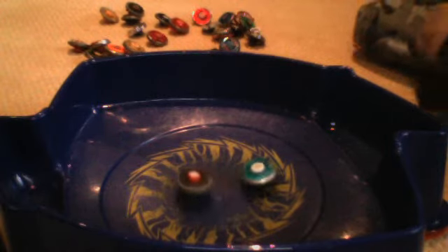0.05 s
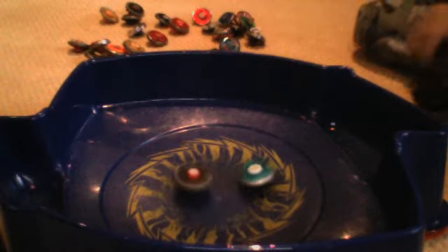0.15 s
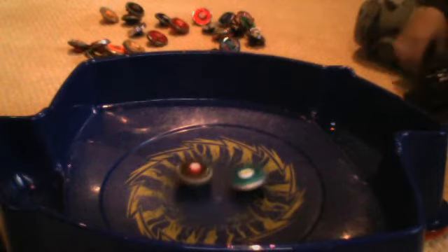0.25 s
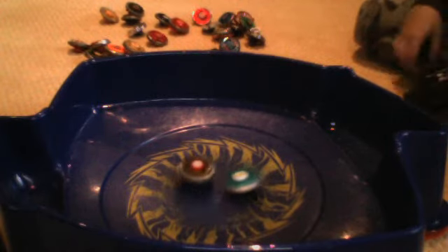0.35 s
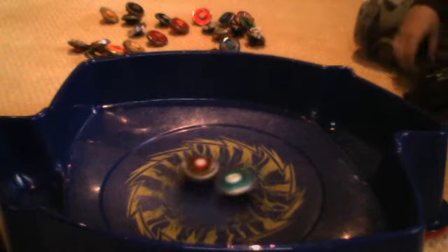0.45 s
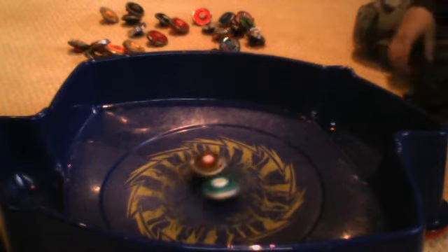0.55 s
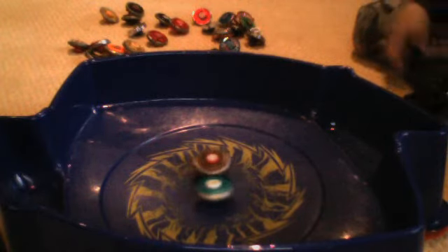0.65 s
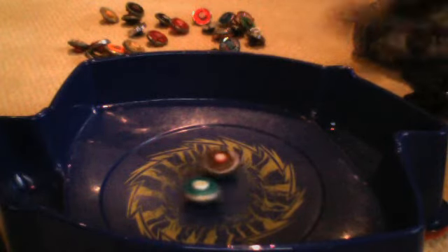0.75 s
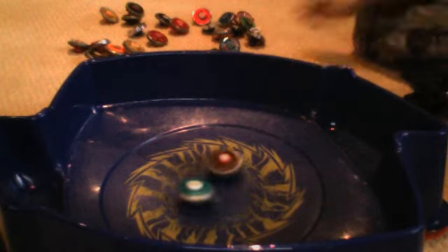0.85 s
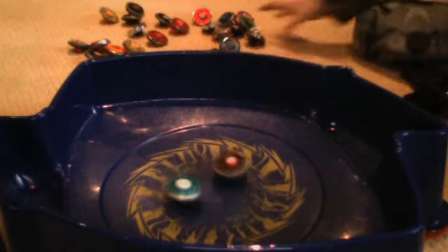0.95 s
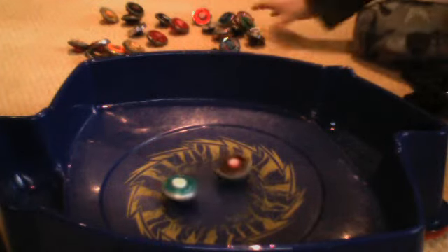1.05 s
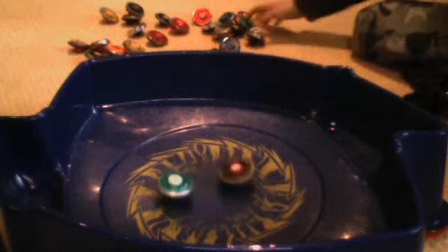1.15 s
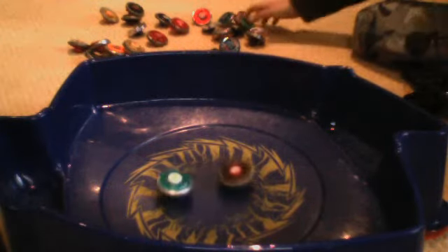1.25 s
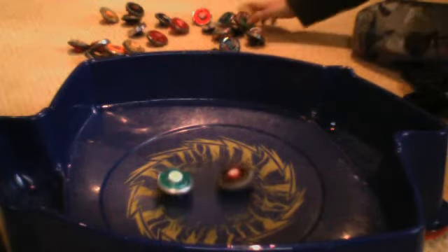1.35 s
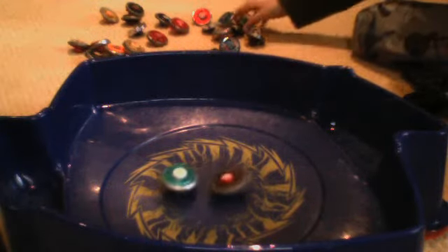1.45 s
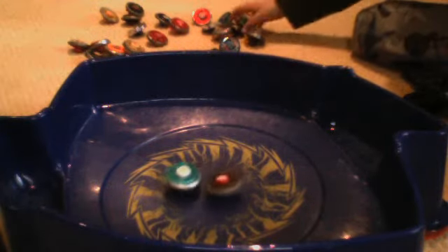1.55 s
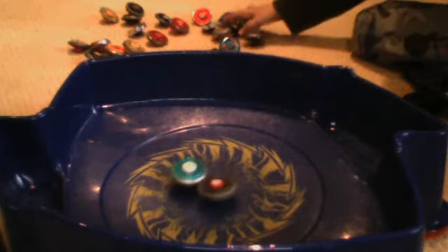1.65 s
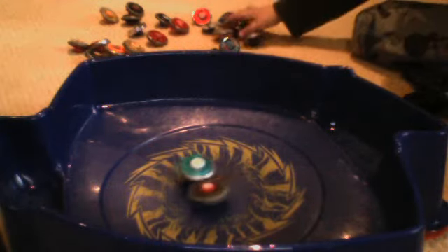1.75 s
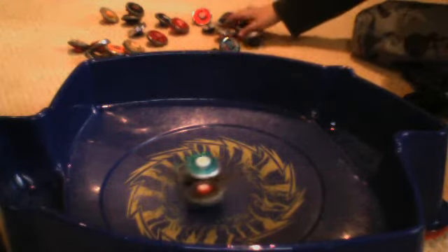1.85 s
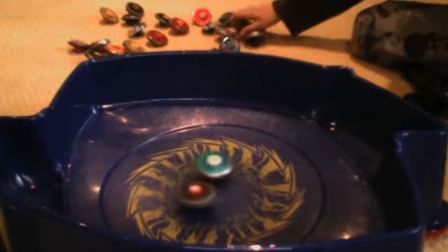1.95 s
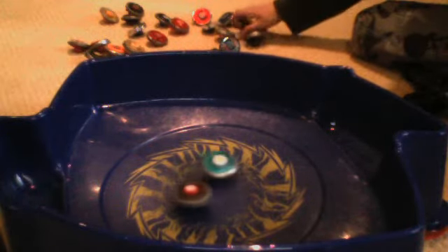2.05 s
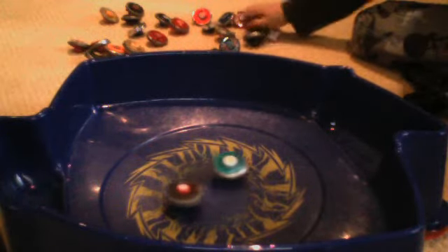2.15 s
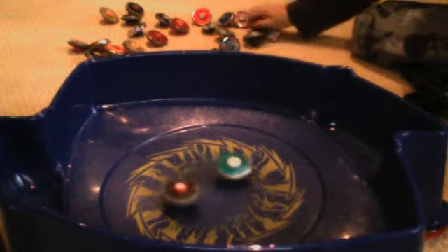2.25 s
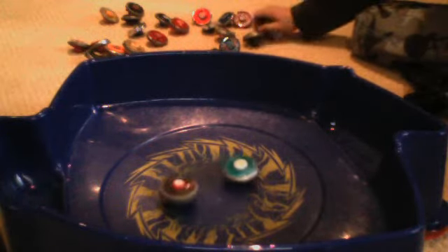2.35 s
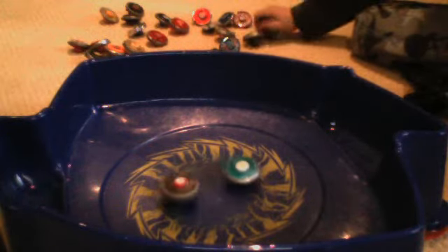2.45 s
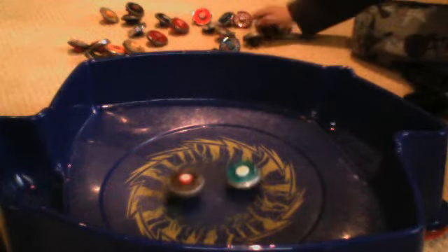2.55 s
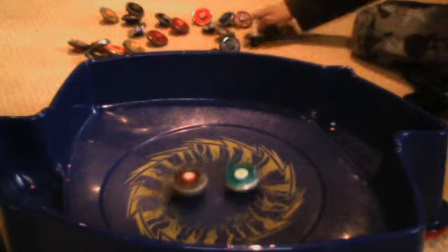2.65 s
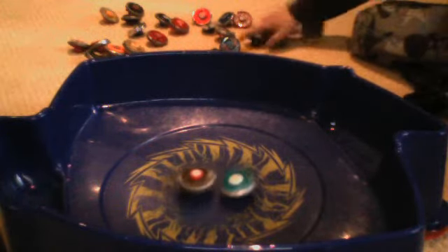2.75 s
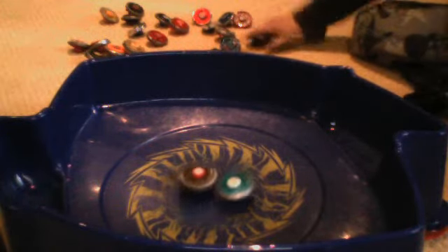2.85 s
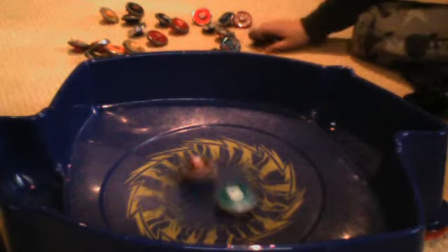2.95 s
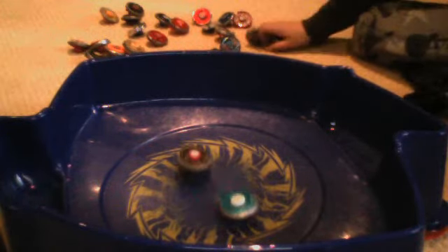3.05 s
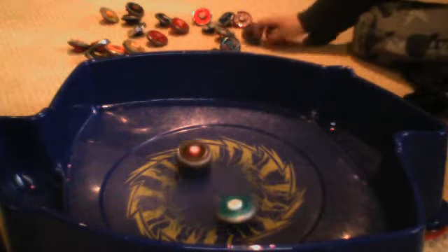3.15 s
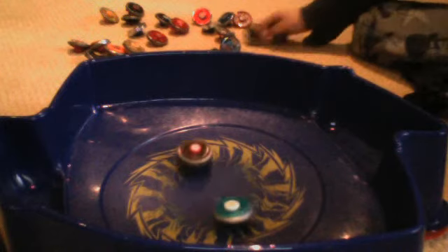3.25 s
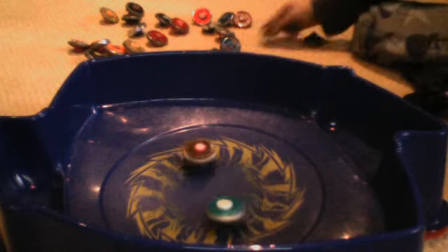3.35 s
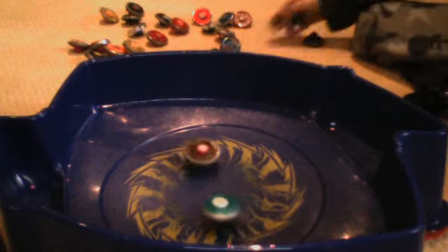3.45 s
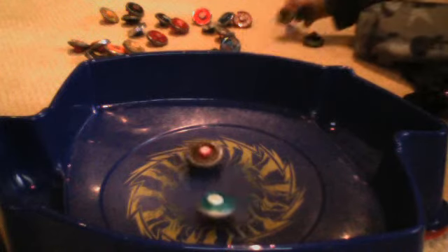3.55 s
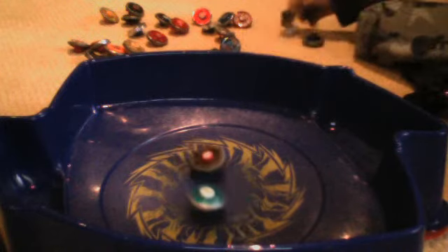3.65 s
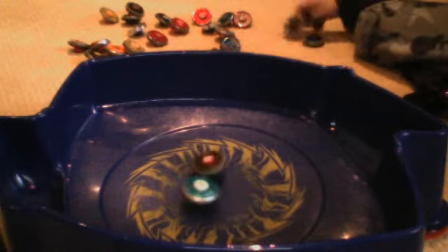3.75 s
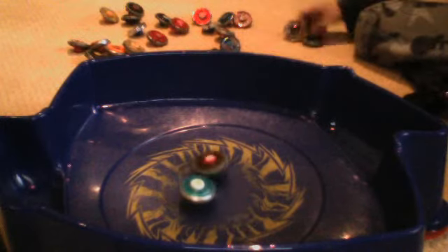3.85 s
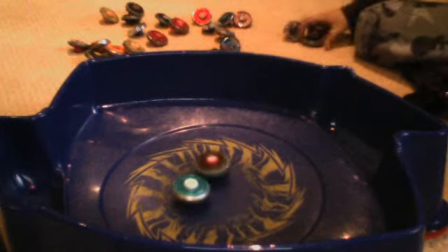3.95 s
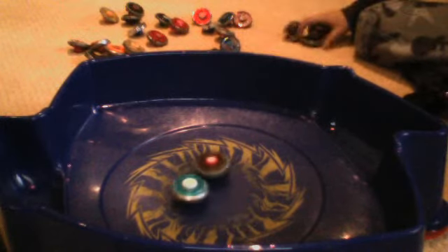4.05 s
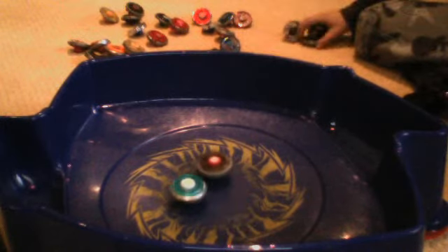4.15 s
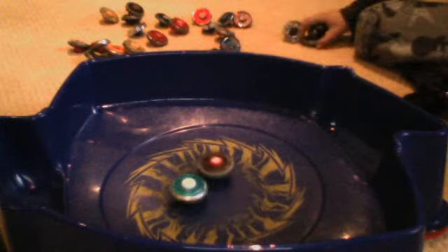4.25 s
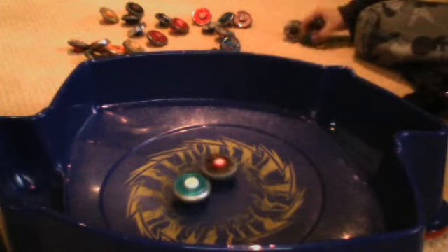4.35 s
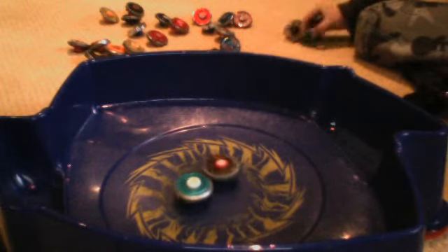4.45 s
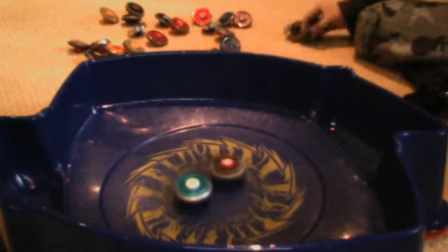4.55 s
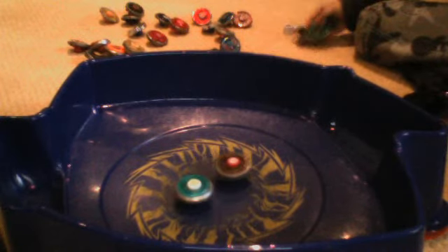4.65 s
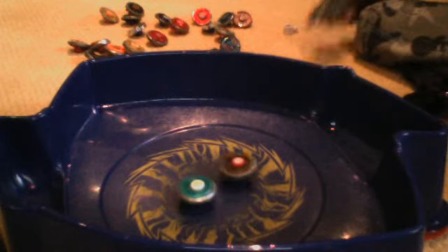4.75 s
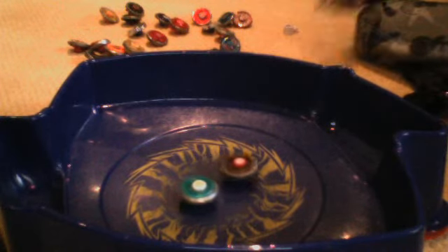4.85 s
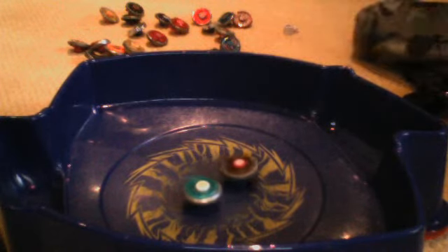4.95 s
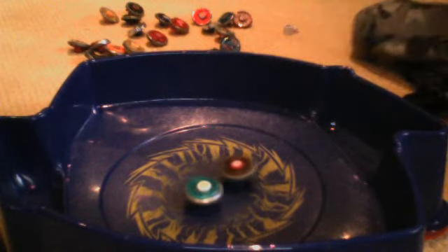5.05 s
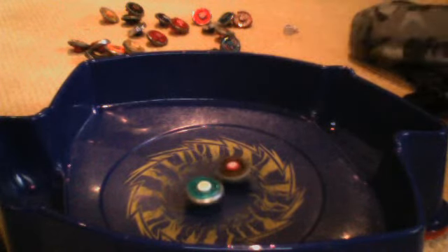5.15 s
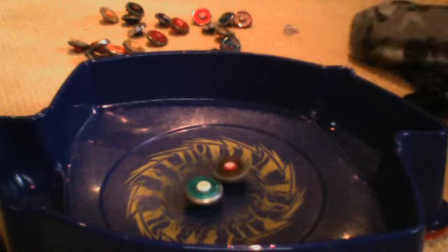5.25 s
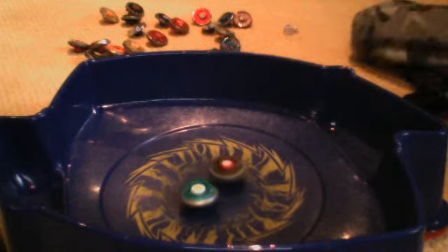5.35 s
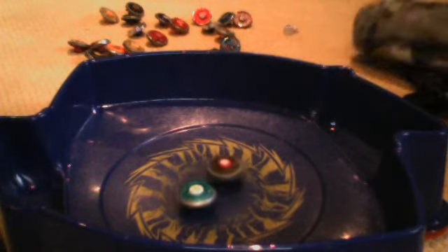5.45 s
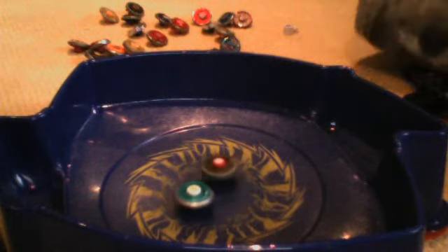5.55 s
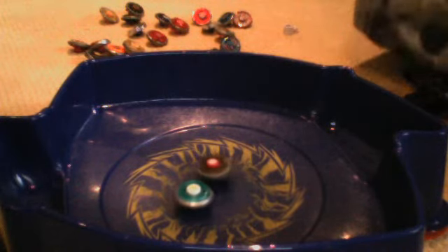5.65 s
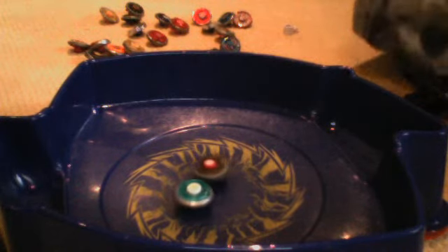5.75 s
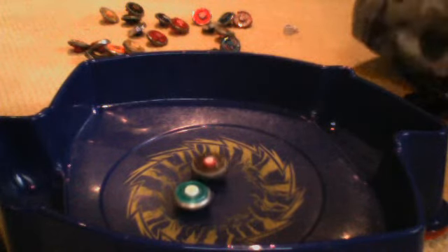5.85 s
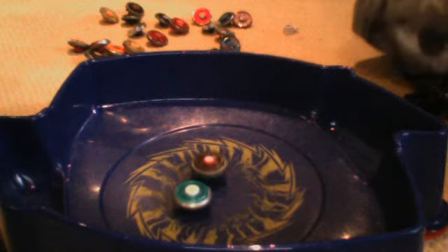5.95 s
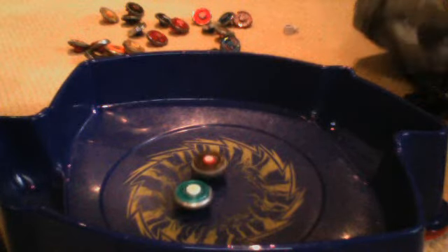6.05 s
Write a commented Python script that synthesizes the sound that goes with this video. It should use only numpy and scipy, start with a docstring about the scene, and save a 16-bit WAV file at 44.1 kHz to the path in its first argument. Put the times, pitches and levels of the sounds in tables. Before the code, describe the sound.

Two metal-ringed tops spin in a plastic bowl, their tips making light, rapid taps and soft scraping under a faint whir. A faint high ring is already fading at the start. The first sharp clink comes at about 0.4 seconds, followed by three quick ones around 1.5 to 1.7. Each leaves a high, fluttering metallic ring and a slight hollow knock from the bowl. A pair lands at 2.7 and 2.9, the second the loudest, with a soft thud just after. Three more come between 3.7 and 4.0, one at 4.4, and two around 5.1 and 5.2. Spare tops clink faintly now and then as they are handled beside the bowl. From about 5.4 to 5.7 a handful of loose parts rattles, and a last strong clash rings out at 5.75. The room is quiet, with a low steady hum.

```python
"""Spinning tops clashing in a bowl

Two metal-ringed tops circle in a plastic bowl. Each clash excites their modes, and the spin splits
the rings' modes into lines that sing on. The wobbling tips tap the bowl floor about once a turn.
Beside the bowl a hand picks over spare tops, something thuds softly, and near the end a handful
of parts rattles. A quiet carpeted room hums below."""
import sys
import numpy as np
from scipy import signal
from scipy.fft import rfft, irfft
from scipy.io import wavfile

SR = 44100
rng = np.random.default_rng(int(sys.argv[2]) if len(sys.argv) > 2 else 0)


def int16_out(signal):
    """Quantize to a 16-bit WAV file."""
    q = np.round(np.clip(np.atleast_2d(signal).T, -1, 1) * 32767)
    wavfile.write(sys.argv[1], SR, q.astype(np.int16))


N = 269010

# Collisions of the tops; the first is already ringing at 0 s. Each row: start in seconds, crack level
# in dB, treble relative to it in dB, disc level in dB, backward and forward wave levels of the first
# ring and then of the second in dB, ring decay time in seconds, bowl boom in dB, its pitch in Hz, hiss
# in dB, highest short modes in dB, forward waves' decay time as a multiple of the ring decay time.
CLASHES = [(0.0, -94, -37, -102, -58.5, -45, -55, -47, 0.5, -65, 544, -80, -84, 0.54),
           (0.44, -24.5, -15, -60.5, -34.5, -27.5, -77.5, -59, 0.73, -49, 490, -54.5, -29, 0.55),
           (1.465, -27, -39, -55, -48, -34.5, -38.5, -30.5, 0.64, -42, 630, -51, -27, 0.89),
           (1.614, -33.5, -28, -56, -31.5, -31, -48.5, -26, 0.2, -69, 624, -52, -35, 0.98),
           (1.666, -28.5, 1, -54.5, -36.5, -43, -30.5, -26.5, 0.55, -65.5, 517, -50.5, -35.5, 1.07),
           (2.732, -28, -4, -50, -31.5, -27, -51, -39, 0.31, -45, 810, -55, -27.5, 1.07),
           (2.854, -17, 15, -30.5, -38.5, -28.5, -56.5, -52, 0.72, -40, 620, -47, -15, 1.105),
           (3.694, -22, 1, -34.5, -58, -74, -33.5, -44, 0.99, -48, 650, -43, -23, .9),
           (3.804, -21, 10.5, -37, -32, -46.5, -36.5, -58, 0.39, -36.5, 746, -49.5, -18.5, .9),
           (3.958, -23.5, 11.5, -40.5, -37, -56, -107, -70, 0.68, -65, 630, -56, -18, 1.8),
           (4.391, -20, -3, -58, -35.5, -40.5, -60.5, -57, 0.5, -50, 795, -55.5, -28.5, 0.96),
           (5.07, -22.5, 4, -54, -44.5, -45, -41.5, -33, 0.67, -79, 376, -60, -27, 1.1),
           (5.211, -27, 4, -41.5, -41.5, -38, -47, -32.5, 0.68, -58.5, 704, -51.5, -25.5, 0.96),
           (5.746, -18.5, 5, -41.5, -42, -32.5, -45, -39, 0.62, -45.5, 560, -46, -39, 0.88)]
# Spectrum of the air whir and of shaken parts hissing. Each row: frequency in Hz, density in dB.
WHIR = [(1500, -20), (3000, 0), (6000, -1), (8200, -6), (9300, -9), (10000, -34.5), (13000, -66)]
SPIN_START, SPIN_LOSS = 25.3, 1.04   # turns per second at 0 s, and lost each second


def amp(db):
    """Decibels as an amplitude ratio."""
    return 10 ** (np.asarray(db) / 20)


def unit_rms(x):
    """Normalisation to unit power."""
    return x / np.sqrt(np.mean(x ** 2) + 1e-20)


def butter(x, order, hz, kind="low"):
    """Butterworth filtering, flat in the passband."""
    return signal.sosfilt(signal.butter(order, hz, kind, fs=SR, output="sos"), x)


def band(x, hz, octaves):
    """Band-pass filtering around hz, scaled to rms 1."""
    edges = np.clip([hz / 2 ** (octaves / 2), hz * 2 ** (octaves / 2)], 20, 15000)
    return unit_rms(butter(x, 2, edges, "band"))


def wobble(hz):
    """Random modulation: low-passed noise of rms 1."""
    return unit_rms(butter(rng.standard_normal(N), 2, hz))


def noise(spectrum):
    """Spectral shaping of white noise, scaled to rms 1."""
    hz, db = np.transpose(spectrum)
    bins_hz = np.arange(1, N // 2 + 2) * SR / N
    gain = amp(np.interp(np.log(bins_hz), np.log(hz), db))
    return unit_rms(irfft(rfft(rng.standard_normal(N)) * gain, N))


def add(out, start, sound):
    """Superposition of a sound from start seconds on."""
    i = round(start * SR)
    out[i:i + len(sound)] += sound[:N - i]


def impulses(times, db):
    """An impulse train with the given levels."""
    out = np.zeros(N) + 1e-18
    np.add.at(out, np.round(np.asarray(times) * SR).astype(int), amp(db))
    return out


def decay(x, t60):
    """Exponential decay: each impulse falls 60 dB in t60 seconds."""
    return signal.lfilter([1], [1, -amp(-60 / (t60 * SR))], x)


def resonator(x, hz, t60):
    """A damped oscillator: each impulse starts a decaying sine."""
    r, w = amp(-60 / (t60 * SR)), 2 * np.pi * hz / SR
    return signal.lfilter([0, np.sin(w)], [1, -2 * r * np.cos(w), r * r], x)


def swell(hz, rise_s, phase=0):
    """A soft contact: a tone that grows for rise_s and dies away."""
    u = np.arange(round(8 * rise_s * SR)) / SR / rise_s
    return (u * np.exp(1 - u)) ** 2 * np.sin(2 * np.pi * hz * u * rise_s + phase)


def room_hum():
    """Stationary background noise, strongest in the bass."""
    # Each row: frequency in Hz, relative density in dB.
    spectrum = [(15, -71), (25, -47.5), (109, 8.5), (323, -5), (377, -8), (440, -3.5), (513, -7),
                (584, -9.5), (1480, -12), (2300, -10.5), (3950, -17), (5530, -28), (5970, -23.5),
                (12000, -59), (15600, -81), (22000, -120)]
    return amp(-70.5) * noise(spectrum)


def singing_rings():
    """Rotation splits bending modes into backward and forward waves, which converge as the spin slows."""
    ring_hz, disc_hz = (5555.3, 5994), (4058, 4075, 4108)   # each ring at rest; a weight disc
    # Lines of a travelling wave, one list per ring. Each row: offset in spin multiples, level in dB.
    ring_lines = [(2, -0.5), (1, -13), (0, -34.5)], [(2, -3.5), (1, -18), (0, -20)]
    # The disc's close modes. Each row: level in dB, decay time in seconds.
    disc_modes = [(-0.5, 0.19), (-2.5, 0.32), (0.5, 0.4)]
    rings, disc = np.zeros(N), np.zeros(N)
    ends = [row[0] for row in CLASHES[1:]] + [N / SR]   # each clash stops the old ringing
    for row, end in zip(CLASHES, ends):
        start, disc_db, ring_s, forward_share = row[0], row[3], row[8], row[13]
        phases = iter(rng.uniform(0, 2 * np.pi, 15))
        t = np.arange(round((end - start) * SR)) / SR
        turns = SPIN_START * (start + t) - SPIN_LOSS * (start + t) ** 2 / 2
        build = 1 - np.exp(-(t + (start == 0)) / 0.0047)   # grows with the first reflections
        for hz, (db, decay_s) in zip(disc_hz, disc_modes):
            fade = amp(disc_db + db - 27.3 * t / decay_s - 70 * (t / decay_s) ** 2)
            add(disc, start, build * fade * np.sin(2 * np.pi * hz * t + next(phases)))
        for hz, lines, waves_db in zip(ring_hz, ring_lines, (row[4:6], row[6:8])):
            for direction, wave_db, decay_s in zip((-1, 1), waves_db, (ring_s, forward_share * ring_s)):
                drop = amp(-40 * t / decay_s - 89 * (t / decay_s) ** 4)
                trace = amp(-25 - 60 * t / 1.1)
                for multiple, db in lines:
                    cycles = hz * t + direction * multiple * turns
                    tone = np.sin(2 * np.pi * cycles + next(phases))
                    add(rings, start, amp(wave_db + db) * build * (drop + trace) * tone)
    flutter = 1 + .09 * wobble(350) + .14 * wobble(30)   # loose, tilting parts roughen the ringing
    return rings * flutter + disc * (1 + .55 * wobble(90))


def tip_contacts():
    """Periodic contact: a wobbling tip strikes once a turn, and now and then skips."""
    # Single taps. Each row, as in the result: time in seconds, level in dB, floor pitch in Hz.
    skips = [(.0887, -60, 1274), (.162, -60, 1365), (.379, -37.5, 1386), (.414, -38.5, 1370),
             (.4493, -34.5, 1430), (.502, -41, 1400), (.5516, -45.5, 1350), (.5986, -42, 1495),
             (.6384, -39.5, 1468), (.7166, -44.5, 1255), (.7228, -42, 1490), (.7604, -47, 1480),
             (1.32, -51, 1127), (1.426, -51, 1490), (1.4724, -39.5, 1410), (1.515, -46.5, 1440),
             (1.6003, -51.5, 1380), (1.6731, -43, 1506), (1.8105, -56, 1570), (2.2395, -51, 1360),
             (2.305, -56, 1320), (2.414, -45, 1346), (2.4573, -42, 1327), (2.5094, -56, 1394),
             (2.5552, -60.5, 1310), (2.745, -38.5, 1430), (2.8444, -38, 1300), (2.8548, -21.5, 1338),
             (2.9153, -35, 1310), (3.025, -38.5, 1392), (3.4475, -53.5, 1273), (3.6672, -42, 1545),
             (3.695, -38.5, 1192), (3.7281, -40, 1200), (3.7813, -41, 1276), (3.8072, -38.5, 1130),
             (3.8781, -45, 1520), (3.9245, -54, 1350), (3.964, -39, 1293), (4.3763, -44.5, 1306),
             (4.3917, -39.5, 1240), (4.4411, -42.5, 1253), (5.071, -49, 1350), (5.0958, -47.5, 1482),
             (5.145, -42.5, 1470), (5.2148, -34.5, 1490), (5.3234, -49, 1253), (5.3778, -52, 1260),
             (5.748, -36, 1300), (5.79, -54, 1280)]
    # Runs of taps. Each row: first and last tap in seconds, first, middle and last level in dB,
    # first and last floor pitch in Hz.
    runs = [(0.244, 0.3648, -66, -57, -43, 1560, 1357), (0.912, 0.997, -60, -59, -66, 1370, 1310),
            (1.022, 1.064, -59, -57, -57.5, 1334, 1505), (1.106, 1.275, -46, -42.5, -49, 1368, 1327),
            (1.905, 2.078, -59, -50.5, -64, 1476, 1390), (2.1192, 2.383, -44.5, -44.5, -48, 1322, 1308),
            (2.5853, 2.721, -57.5, -53.5, -47.5, 1450, 1395), (3.0843, 3.3544, -44.5, -52, -54, 1290, 1170),
            (3.456, 3.6306, -49.5, -56, -48, 1545, 1540)]
    taps = list(skips)
    for first, last, first_db, mid_db, last_db, first_hz, last_hz in runs:
        turns = round((last - first) * (SPIN_START - SPIN_LOSS * first))
        u = np.linspace(0, 1, turns + 1)
        bow_db = (mid_db - (first_db + last_db) / 2) * 4 * u * (1 - u)
        db = first_db + (last_db - first_db) * u + bow_db
        taps += zip(first + (last - first) * u, db, first_hz + (last_hz - first_hz) * u)
    return np.array(taps)


def tip_taps():
    """Impact excitation: each tap swells in the thin floor and drags over its neighbouring modes."""
    # Overtones of a tap. Each row: frequency in Hz, relative level in dB.
    overtones = [(2750, -7.5), (3680, -1.5)]
    taps = tip_contacts()
    drag = decay(decay(impulses(taps[:, 0], taps[:, 1] - 57), 0.14), 0.028)
    out = drag * band(rng.standard_normal(N), 1296, 0.36)
    for (start, db, hz), (shift, *colours) in zip(taps, rng.uniform(-1, 1, (len(taps), 3))):
        add(out, start - .0015, amp(db - 1.5) * swell(hz, 0.0052, np.pi * shift))
        bright_db = -68 + .5 * (db + 45.5)   # overtones follow half the tap's swing in level
        for (overtone_hz, overtone_db), colour in zip(overtones, colours):
            overtone = swell(overtone_hz * (1 + 0.016 * shift), 0.0053, np.pi * shift)
            add(out, start, amp(bright_db + overtone_db + 6 * colour) * overtone)
    return out


def tip_grinding():
    """Friction: dense scuffs drive the floor mode while the bowl rumbles and the air whirs."""
    # Each row: time in seconds, scuff level in dB, floor pitch in Hz, rumble level in dB.
    grind = [(0, -70, 1400, -75), (.15, -72, 1330, -73), (.45, -73.5, 1400, -67.5), (.81, -65, 1446, -69.5),
             (.98, -86.5, 1334, -75.5), (1.32, -77, 1350, -70.5), (1.63, -63, 1460, -74.5),
             (2.07, -77.5, 1340, -71.5), (2.29, -67.5, 1267, -73), (2.55, -89.5, 1354, -82.5),
             (2.9, -51.5, 1330, -74), (3.2, -75.5, 1250, -73), (3.6, -76.5, 1468, -76),
             (3.75, -51.5, 1213, -64), (3.9, -79, 1322, -80), (3.99, -58, 1337, -81),
             (4.08, -86.5, 1314, -89.5), (5.05, -84, 1403, -77), (5.28, -56, 1468, -79.5),
             (5.45, -83, 1410, -76), (5.59, -62, 1448, -63), (5.75, -86, 1297, -98), (6.1, -84, 1360, -88)]
    # The bowl's rumble. Each row: frequency in Hz, relative density in dB.
    rumble = [(90, -37.5), (200, 1.5), (500, -4.5), (900, -14), (1500, -40.5)]
    times, *columns = np.transpose(grind)
    scuff_db, hz, rumble_db = [np.interp(np.arange(N) / SR, times, c, -200, -200) for c in columns]
    scuffs = (rng.random((2, N)) < 260 / SR) * rng.standard_normal((2, N)) + 1e-18
    drive = butter(scuffs, 2, 110)   # half the bandwidth of the floor mode
    phase = 2 * np.pi * np.cumsum(hz) / SR
    floor = unit_rms(drive[0] * np.cos(phase) + drive[1] * np.sin(phase))
    whir_db = -83 + .5 * (rumble_db + 73)
    return amp(scuff_db) * floor + amp(rumble_db) * noise(rumble) + amp(whir_db) * noise(WHIR)


def thuds():
    """Heavy damping: a low push swells and dies within a cycle or two, with a rough puff."""
    # Each row: start in seconds, level in dB, pitch in Hz.
    pushes = [(0.171, -39, 368), (.195, -53, 450), (0.49, -44, 131), (1.467, -55, 129), (2.894, -48, 131),
              (2.91, -43, 250), (2.925, -36.5, 286), (2.944, -40, 400), (2.965, -46.5, 140),
              (3.722, -45.5, 396), (3.827, -50.5, 242), (5.038, -46.5, 414), (5.048, -58, 161)]
    out = np.zeros(N)
    for start, db, hz in pushes:
        push = swell(hz, 0.72 / hz)
        envelope = np.abs(swell(hz / 8, 2.02 / hz, np.pi / 2)[:len(push)])
        puff = band(rng.standard_normal(SR // 4), hz, 0.91)[:len(push)]
        add(out, start, amp(db) * (push + 0.24 * envelope * puff))
    return out


def spare_top_clinks():
    """Selective excitation: a touch shakes the modes near its own pitch, each a narrow dying noise."""
    # Rough modes of the spare tops. Each row: frequency in Hz, level in dB, 60 dB decay time in seconds.
    modes = [(2300, 2, 0.21), (2650, -5.5, 0.21), (3186, 0.5, 0.17), (3790, 0.5, 0.2), (4100, -2.5, 0.12),
             (5050, -4.5, .15), (5650, -1.5, 0.22), (6400, -1, 0.17), (7190, 3.5, 0.08), (8100, -2.5, 0.34),
             (8800, 1, 0.19), (10000, -4, 0.11)]
    # Each row: start in seconds, level in dB, pitch struck best in Hz, spread in octaves,
    # factor on the decay time.
    touches = [(0.376, -63, 2660, 0.088, 4.5), (.505, -50, 6360, .1, 1.2),
               (0.916, -56.5, 3670, 0.071, 0.33), (1.072, -64, 3360, 0.21, 0.12),
               (1.092, -55.5, 3530, 0.068, 0.66), (1.255, -61.5, 5200, 0.41, 0.63),
               (1.547, -58, 3200, 0.65, 0.76), (2.023, -52.5, 4170, 0.37, 1.02),
               (2.026, -49, 6800, 0.23, 0.64), (2.16, -54.5, 6400, 0.093, 0.33),
               (2.162, -64.5, 8800, .15, 0.27), (2.225, -63, 4100, 0.11, 1.2),
               (2.249, -71, 8100, 0.087, 0.46), (2.449, -57.5, 6400, 0.17, 0.64),
               (2.452, -66, 10000, .1, 0.9), (3.535, -58, 3130, .1, 1.15), (3.538, -55, 5050, .1, 1.03),
               (3.538, -62.5, 8200, 0.25, 0.83), (3.604, -70.5, 8600, 0.093, 0.34),
               (4.04, -57.5, 2640, 0.35, 0.53), (4.043, -59, 7350, 0.22, .5), (4.312, -77, 8490, .2, 1),
               (4.892, -62.5, 2330, .1, 0.23), (5.144, -51, 3000, 0.08, 0.1),
               (5.377, -68.5, 8300, .15, 0.36), (5.439, -55.5, 4910, 0.5, 2.2)]
    out, t = np.zeros(N), np.arange(SR // 4) / SR
    attack = 1 - np.exp(-t / 0.00078)
    for hz, mode_db, t60 in modes:
        envelope = np.zeros(N)
        for start, db, best_hz, octaves, share in touches:
            off_pitch_db = -6 * (np.log2(hz / best_hz) / octaves) ** 2
            add(envelope, start, attack * amp(db + mode_db + off_pitch_db - 60 * t / (t60 * share)))
        out += envelope * band(rng.standard_normal(N), hz, octaves=.09)
    return out


def clashes():
    """A brief impact has a broad spectrum: a crack, a grainy tail, a hiss and short-lived modes."""
    # Bright crack and its tail, filtered with a narrow gap at 11 kHz.
    # Each row: frequency in Hz, relative density in dB.
    spectrum = [(1200, -30.5), (2000, -7), (2700, -1), (4000, 8), (5200, 5.5), (6800, 6.5), (8200, -6),
                (9000, -8), (10300, -10), (10700, -15.5), (11000, -43.5), (11400, -15), (12300, -15),
                (13500, -70)]
    # Frequencies of the tops' short modes in Hz.
    modes_hz = 2700, 3100, 3800, 5130, 6730, 7300, 8060, 9748, 9842, 10252, 10338, 11800
    # The same modes in order. Each row: level in dB, 60 dB decay time in seconds.
    modes = [(-30, 0.017), (-37.5, 0.038), (-33.5, 0.05), (-30.5, .05), (-36.5, 0.049), (-35.5, 0.085),
             (-33.5, 0.071), (-42.5, 0.12), (-40, 0.16), (-42.5, 0.097), (-44, 0.21), (-49.5, 0.16)]
    starts, db, treble_db, hiss_db, highest_db = np.transpose(CLASHES)[[0, 1, 2, 11, 12]]
    broadband = noise(spectrum)
    treble = butter(broadband, 4, 9200, "high")
    grain_sizes = amp(5 * np.minimum(rng.exponential(1, N), 2))
    chatter = decay(grain_sizes * (rng.random(N) < 200 / SR), .04)   # loose parts
    out = np.zeros(N)
    for part, part_db, tail_db, t60 in ((broadband - treble, db, -24, .22),
                                        (treble, db + treble_db, -15, .25)):
        blows = impulses(starts, part_db)
        crack = decay(decay(blows, .016), .008) / 42   # rises in about a millisecond
        grainy_tail = amp(tail_db) * decay(blows, t60) * (0.51 + 0.14 * chatter)
        out += part * (crack + grainy_tail + amp(-33) * decay(blows, 0.29))
    out += noise(WHIR) * decay(decay(impulses(starts, hiss_db), .3), .05) / 320   # shaken parts hiss on
    scatter_db = rng.normal(0, 3, (len(starts), len(modes)))
    for hz, (mode_db, t60), uneven_db in zip(modes_hz, modes, scatter_db.T):
        blow_db = highest_db if hz > 9200 else db
        jostling = decay(impulses(starts, blow_db + mode_db - 5.5 + uneven_db), 0.09)
        mode = resonator(jostling * rng.standard_normal(N), hz, t60)
        out += mode * (.8 + .5 * wobble(140))   # the parts buzz
    return butter(out, 4, 1500, "high")   # small tops radiate no bass


def bowl_boom():
    """A broad, damped resonance of the bowl answers each clash."""
    out, t = np.zeros(N), np.arange(SR // 4) / SR
    for start, db, hz in np.array(CLASHES)[:, [0, 9, 10]]:
        envelope = amp(db - 60 * t / 0.14) * (1 - np.exp(-t / 0.0077))
        add(out, start, envelope * band(rng.standard_normal(len(t)), hz, 0.93))
    return out


def rattling_parts():
    """Random impacts merge in the room's reverberation, with clear knocks above and a hollow body below."""
    # Each row: start, rise and hold in seconds, bright level in dB, hollow level in dB.
    shakes = [(5.357, 0.052, 0.066, -72, -65.5), (5.484, 0.0053, 0.033, -40.5, -52.5),
              (5.533, .003, 0.024, -43, -51), (5.631, .003, 0.0027, -43.5, -49.5),
              (5.674, 0.036, .01, -54, -59.5)]
    # The clearest knocks. Each row: time in seconds, level in dB.
    knocks = [(5.4863, -36.5), (5.4978, -49), (5.5345, -49), (5.549, -41), (5.557, -39), (5.634, -38),
              (5.704, -51), (5.714, -51)]
    # Spectrum of the parts. Each row: frequency in Hz, relative density in dB.
    spectrum = [(530, -69), (900, -9), (1180, -5), (1410, -8.5), (1540, -0.5), (1660, -6.5), (1980, -1.5),
                (2420, -4.5), (3180, 1.5), (5040, -6.5), (5500, -9), (9010, -19), (10500, -34),
                (12400, -64), (16100, -88), (22000, -120)]
    # Modes of the hollow body. Each row: frequency in Hz, level in dB, 60 dB decay time in seconds.
    body_modes = [(316, -16, .03), (560, 4, 0.027), (738, -9, 0.04)]
    t, bright_level, hollow_level = np.arange(N) / SR, 0, 0
    for start, rise, hold, bright_db, hollow_db in shakes:
        attack = np.clip((t - start) / rise, 0, 1) ** 2
        release = amp(-60 * np.maximum(t - start - rise - hold, 0) / 0.29)
        bright_level += amp(bright_db) * attack * release
        hollow_level += amp(hollow_db) * attack * release
    impacts = amp(3.8 * np.minimum(rng.exponential(1, N), 4)) * (rng.random(N) < 700 / SR)
    colour = noise(spectrum) + 0.35 * band(rng.standard_normal(N), 3090, 0.24)   # one part rings
    smeared = bright_level * unit_rms(decay(impacts, .035))
    clear = decay(impulses(*np.transpose(knocks)), 0.03)
    bright = butter((smeared + clear) * colour, 2, 700, "high")
    hollow = sum(amp(db) * resonator(impacts * rng.choice([-1, 1], N), hz, t60)
                 for hz, db, t60 in body_modes)
    return bright + hollow_level * unit_rms(hollow)


def scene():
    """Superposition of all sources in one channel."""
    tops = singing_rings() + clashes() + bowl_boom() + tip_taps() + tip_grinding()
    return (tops + spare_top_clinks() + thuds() + rattling_parts() + room_hum())[None]


def record(dry):
    """Band limiting: a small microphone loses deep bass and rounds peaks; the top is cut steeply."""
    thin = butter(dry, 1, 60, "high")
    rounded = .3 * np.tanh(thin / .3)
    treble_cut = signal.cheby2(12, 70, 13000, fs=SR, output="sos")
    return signal.sosfilt(treble_cut, rounded) + amp(-103) * rng.standard_normal(N)


dry = scene()
out = record(dry)
int16_out(out)
```